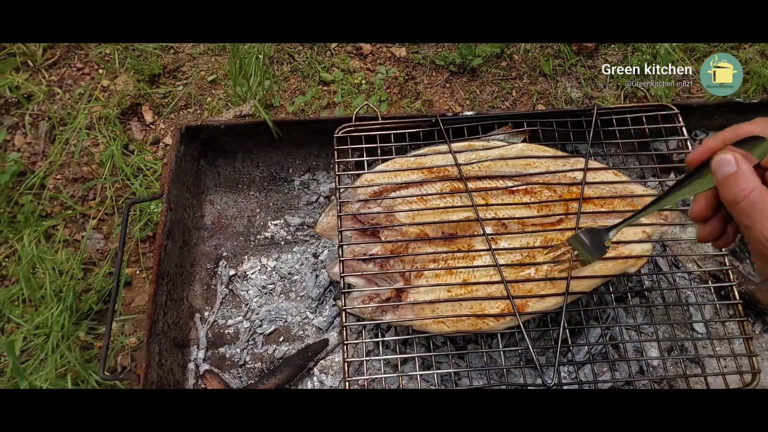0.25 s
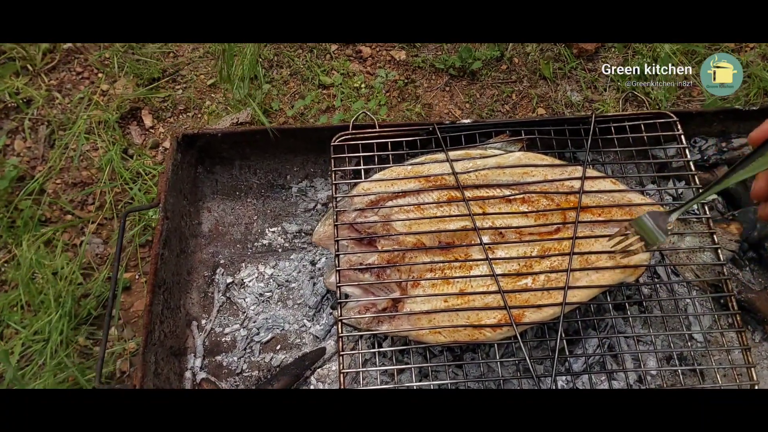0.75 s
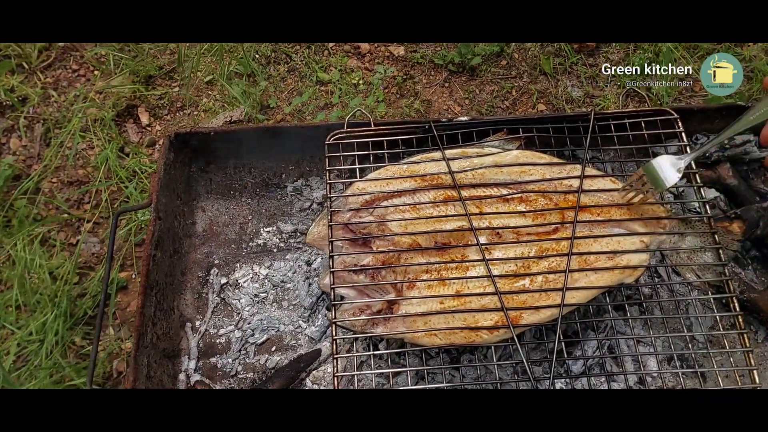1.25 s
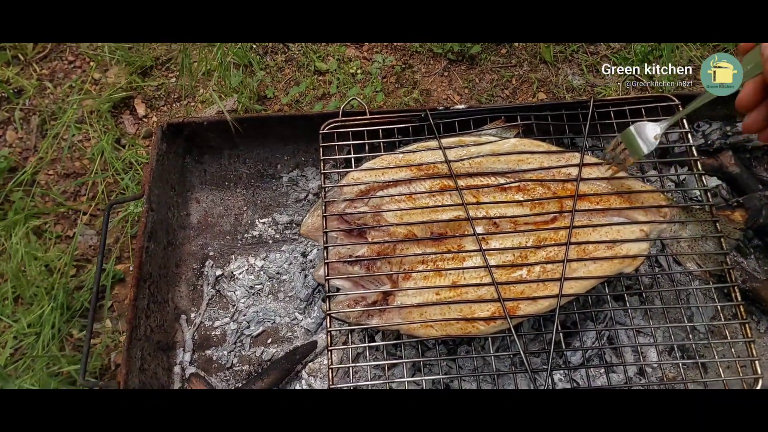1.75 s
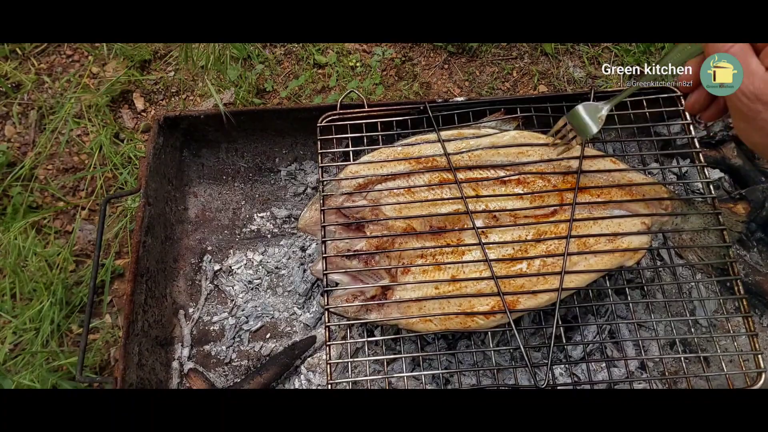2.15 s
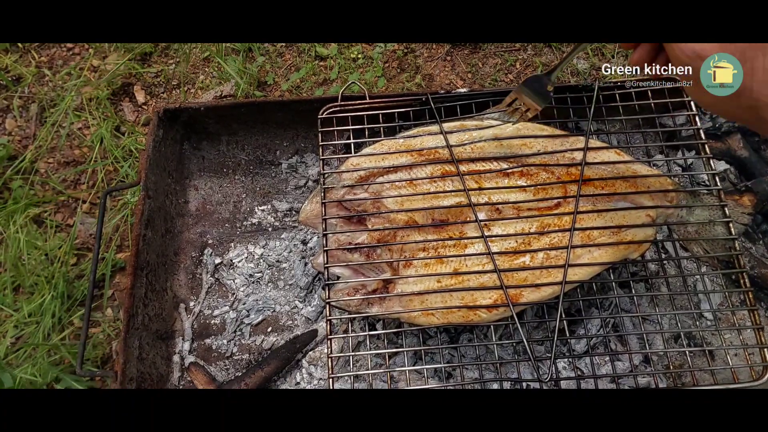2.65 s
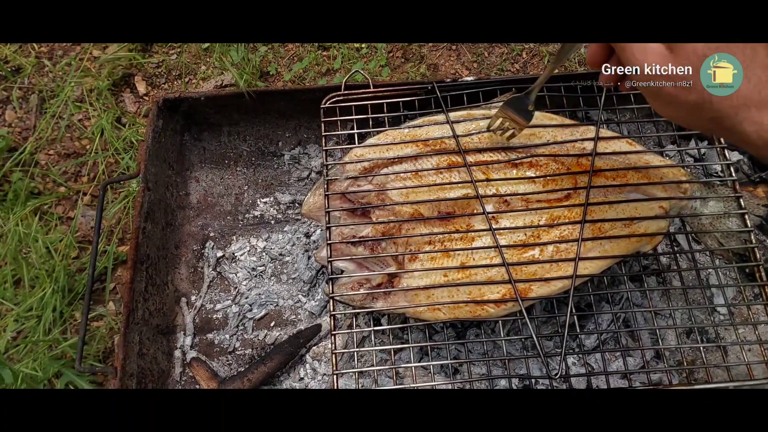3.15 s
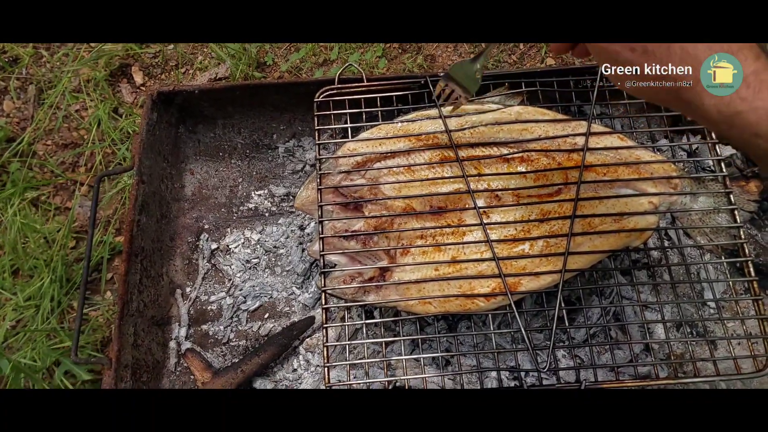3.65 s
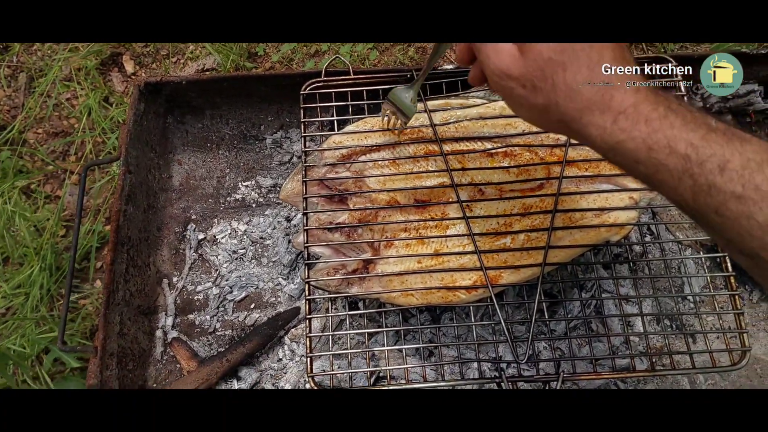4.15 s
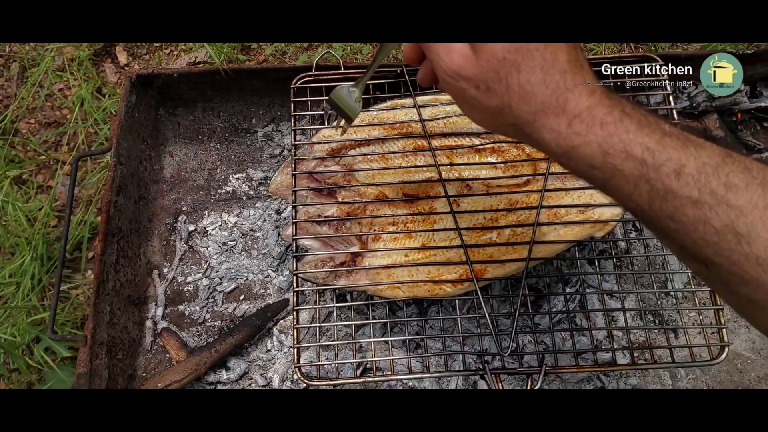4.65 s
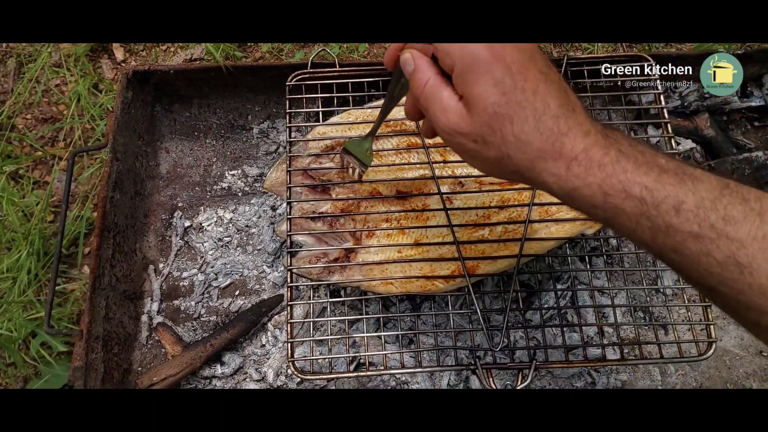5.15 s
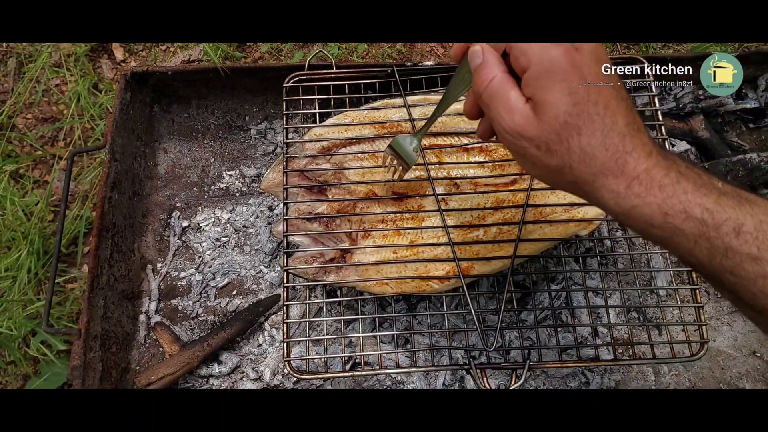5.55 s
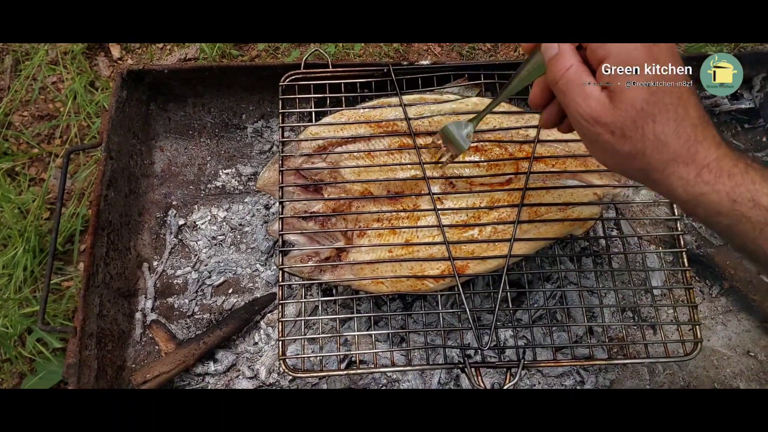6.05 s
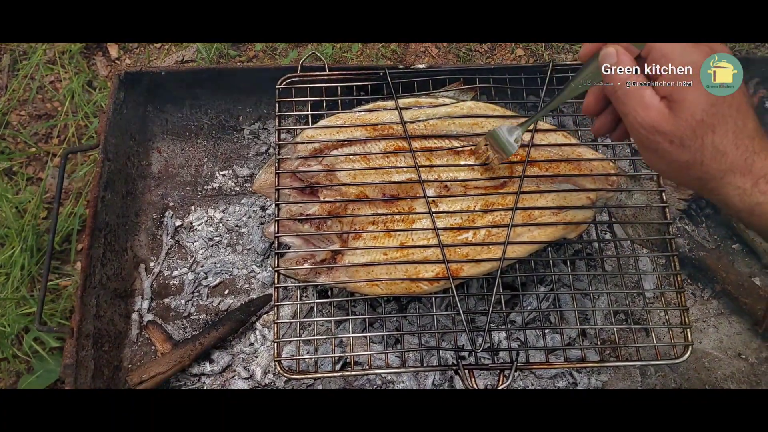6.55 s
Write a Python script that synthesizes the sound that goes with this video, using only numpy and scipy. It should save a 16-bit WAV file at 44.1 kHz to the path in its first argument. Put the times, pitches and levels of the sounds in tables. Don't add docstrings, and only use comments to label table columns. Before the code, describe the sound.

Fish frying over embers in the open air, heard close. Wind rumble swells and drops away early. Crisp, uneven fork jabs follow, strongest around five seconds, with slight metallic tine ring and soft thuds from the wire basket. Beneath lie fine sizzling, popping fat, leaf rustle and faint airy roar; a few dry coal splits stand out, and light metal drags appear near the end.

```python
import sys
import numpy as np
from scipy import signal
from scipy.fft import rfft, irfft
from scipy.io import wavfile
from scipy.ndimage import uniform_filter1d

SR = 44100
rng = np.random.default_rng(int(sys.argv[2]) if len(sys.argv) > 2 else 0)


def int16_out(signal):
    q = np.round(np.clip(np.atleast_2d(signal).T, -1, 1) * 32767)
    wavfile.write(sys.argv[1], SR, q.astype(np.int16))


def amplitude_ratio(level_db):
    exponent = np.asarray(level_db, float) / 20
    return 10 ** exponent


N = 299880

# (pitch [Hz], level [dB], t60 [s])
TINE_MODES = [(2560, -7, .014), (4850, -1, .009), (5900, 0, .009), (7400, -1, .01), (9250, -3, .012),
              (10500, 1, .012), (13500, 3, .012), (14900, 2, .01)]
# (time [s], lag [samples])
FORK_LAG_CURVE = [(0, 4), (1.6, 6), (2.3, 1), (5.0, -3), (6.8, -1)]


def rms_one(x):
    return x / np.sqrt(np.mean(x ** 2) + 1e-20)


def in_time(rows):
    s, *columns = np.transpose(rows)
    return [np.interp(np.arange(N) / SR, s, column) for column in columns]


def at_hz(points, hz):
    table_hz, values = np.transpose(points)
    return np.interp(np.log(hz), np.log(table_hz), values)


def fork_lag(s):
    return np.interp(s, *np.transpose(FORK_LAG_CURVE))


def band(x, low_hz, high_hz):
    sos = signal.butter(2, [low_hz, high_hz], "band", fs=SR, output="sos")
    return signal.sosfilt(sos, x + 1e-18)


def third_octaves(low_hz, count):
    edges_hz = low_hz * 2 ** (np.arange(count + 1) / 3)
    return list(zip(edges_hz, edges_hz[1:]))


def drift(rate_hz):
    r = np.exp(-2 * np.pi * rate_hz * 40 / SR)
    slow = signal.lfilter([1], [1, -2 * r, r * r], rng.standard_normal(N // 40 + 2002))[2000:]
    return np.interp(np.arange(N) / 40, np.arange(len(slow)), rms_one(slow))


def dying(t60_s, size):
    return amplitude_ratio(-60 * np.arange(size) / SR / t60_s)


def ring(force, modes):
    out = 0
    for k, (hz, level_db, t60_s) in enumerate(modes):
        r = amplitude_ratio(-60 / (t60_s * SR))
        w = 2 * np.pi * hz / SR
        mode = signal.lfilter([0, amplitude_ratio(level_db) * np.sin(w)], [1, -2 * r * np.cos(w), r * r], force + 1e-18)
        out = out + (-1) ** k * mode
    return out


def varied(modes, detune, spread_db):
    chance = rng.standard_normal((len(modes), 2))
    return [(hz * (1 + detune * a), level_db + spread_db * b, t60_s)
            for (hz, level_db, t60_s), (a, b) in zip(modes, chance)]


def add(out, sound, s, pan_db, lag):
    for port, (late, gain_db) in enumerate([(lag, pan_db / 2), (0, -pan_db / 2)]):
        at = max(round(s * SR + late), 0)
        out[port, at:at + len(sound)] += amplitude_ratio(gain_db) * sound[:N - at]


def pricks():
    # (time [s], crunch [dB], thud [dB], boom [dB], crunch t60 [s])
    prick_rows = [(0.0126, -28, -28.5, -37, 0.21), (1.2222, -13.5, -33.5, -45, 0.14),
                  (1.592, -17, -31, -39, 0.14), (1.9734, -15.5, -28.5, -47.5, 0.1),
                  (2.3291, -26, -33, -38, 0.2), (2.7208, -21, -51, -52.5, 0.16),
                  (3.0689, -18, -35.5, -40.5, 0.093), (3.4161, -36, -47, -46, 0.56),
                  (3.7877, -27, -33.5, -40, 0.11), (4.0826, -7.5, -33, -37, 0.072),
                  (4.4139, -40, -45, -54.5, 0.17), (4.7348, -23, -39.5, -39, 0.11),
                  (5.046, 1.5, -29, -33.5, 0.08), (5.3461, -8, -38.5, -38.5, 0.12),
                  (5.677, -36, -69, -49, 0.09), (6.7719, -35.5, -39, -54, 0.56)]
    # (low sway [dB], upper wires [dB], push [s])
    load_rows = [(6, 0, 0.0081), (-3, 0.5, 0.015), (7, 10.5, 0.009), (0.5, 4.5, 0.02), (1.5, 3.5, 0.011),
                 (-2, 2, 0.022), (8, 2.5, 0.0093), (-0.5, -6, 0.013), (5, 0, 0.0087), (-11, 0.5, 0.0076),
                 (5, -1, 0.016), (0, -2, .012), (-9, -3, 0.014), (0.5, 0, 0.014), (1, -6, 0.0185),
                 (3, 8, 0.0096)]
    # (pitch [Hz], level [dB], t60 [s])
    basket_modes = [(188, 0.5, 0.037), (229, -10, 0.17), (322, 0, 0.13), (348.9, -16.5, 0.56),
                    (370.7, -4.5, 0.15), (556, -6, 0.053), (675, -4.5, 0.029), (880, -17, 0.036),
                    (1350, -13, 0.061)]
    dull_crunch_db = -15
    size = 9000
    out = np.zeros((2, N))
    t = np.arange(size) / SR
    for (s, bright_db, thud_db, boom_db, t60_s), (low_db, upper_db, push_s) in zip(prick_rows, load_rows):
        dull_db = (bright_db + thud_db) / 2 + dull_crunch_db
        lag = fork_lag(s)
        uneven_db = 3 * np.repeat(rng.standard_normal(size // 40), 40)
        shards = rng.standard_normal(size) * amplitude_ratio(uneven_db)
        bright = band(band(shards * dying(.65 * t60_s, size), 10200, 16500), 9000, 17000)
        dull = band(shards * dying(t60_s, size) * (1 - np.exp(-t / .002)), 2000, 7200)
        tines = amplitude_ratio(-30) * ring(shards * dying(.03, size), varied(TINE_MODES, .02, 5))
        add(out, amplitude_ratio(bright_db - 19.5) * bright, s, -7.0, lag)
        add(out, amplitude_ratio(dull_db + 7.5) * (dull + tines), s, 3.0, lag)

        thud = band(rng.standard_normal(size) * t / 0.02 * np.exp(1 - t / 0.011), 257, 1075)
        loaded = [(hz, level_db + low_db * (hz < 260) + upper_db * (hz > 500), ring_s)
                  for hz, level_db, ring_s in basket_modes]
        push = rng.standard_normal(size) * t / push_s * np.exp(1 - t / push_s)
        boom = ring(push, varied(loaded, 0.0266, 2.5))
        boom = boom / abs(boom).max()
        add(out, amplitude_ratio(thud_db + 8.5) * thud + amplitude_ratio(boom_db + 10.0) * boom, s, .3, lag)
    return out


def snap_rows():
    # (time [s], level [dB], brightness [dB], left lag [samples])
    skin_rows = [(0.0144, -36.5, 5.5, 8.5), (1.2228, -36.5, 9, 8.5), (1.5937, -31, 10, 11),
                 (1.9762, -33.5, 10, 6.5), (1.9931, -36, -26, 10), (2.33, -34, 6, 11),
                 (2.341, -33.5, 7, -7), (2.7111, -39.5, 5, -0.5), (2.7214, -32.5, 9, 5.5),
                 (2.7349, -37, -5, 6), (3.0706, -37.5, 11.5, 1), (3.4176, -35, 6.5, 7),
                 (3.7805, -34.5, 5, 5.5), (3.7899, -30.5, 4.5, -1), (4.0845, -39.5, 13, -3.5),
                 (4.4135, -46.5, 6, 2), (4.4232, -50, 9, 11), (4.7367, -36, 13.5, -6.5),
                 (5.0475, -29.5, 5, -11.5), (5.0517, -30.5, 15, -5), (5.0923, -36.5, 3, 6),
                 (5.1054, -43, 1.1, 6), (5.11, -46, 8, -8), (5.117, -39, 3, -3.5),
                 (5.1276, -46.5, 12, -0.5), (5.3465, -35.5, 9.5, 8.5), (5.3556, -37, 7, 7),
                 (5.6665, -46.5, 8, -1), (6.772, -43, -4, 3), (6.7764, -51.5, 16, 5.5),
                 (1.571, -42.5, 0, 7.5), (2.7045, -64, 3, 2), (3.2605, -47, -1, 1), (6.601, -53.5, -4, 1.5)]
    # (time [s], dull [dB], bright [dB])
    ember_rows = [(0.324, -34.5, -50), (0.5941, -34.5, -39), (0.651, -34.5, -39), (1.1209, -42, -51),
                  (1.3178, -31.5, -41), (2.1476, -42, -70), (2.2638, -40, -51), (2.4316, -25, -34),
                  (2.6558, -33, -39), (2.671, -41, -46), (3.031, -36.5, -40), (3.1654, -32, -47),
                  (3.222, -19, -30), (3.4614, -16, -20), (4.0186, -38.5, -51), (4.116, -36, -43),
                  (4.183, -39, -44), (4.22, -35, -41), (4.6345, -37, -39), (5.3078, -34, -37),
                  (5.7159, -46, -53), (5.739, -41, -54), (5.792, -35, -41), (5.9217, -42, -37),
                  (6.103, -35.5, -47), (6.115, -39, -44), (6.254, -29, -46), (6.35, -33, -47),
                  (6.5064, -34.5, -52)]
    # (time [s], dull [dB], bright [dB])
    drop_rows = [(0.204, -40, -45), (0.4869, -39, -42.5), (0.5725, -28, -32), (0.6135, -48, -43),
                 (0.795, -36, -35.5), (1.134, -46, -45), (1.1615, -40, -42), (1.3316, -36, -42),
                 (1.6746, -39, -43), (1.6846, -34.5, -39), (2.1003, -39.5, -48), (2.2024, -60, -50),
                 (3.8387, -36, -39), (4.167, -42, -45), (4.293, -35, -44), (4.3146, -46, -44),
                 (4.3856, -42, -42), (4.5598, -42, -47), (4.8143, -36.5, -46), (5.1424, -42, -46),
                 (5.1539, -40, -42), (5.2042, -42, -45), (5.2215, -39, -43), (5.5054, -54, -47),
                 (5.5933, -48, -47), (5.7868, -42, -41), (5.886, -46, -50), (5.896, -47, -48),
                 (5.9291, -39, -42), (6.004, -38.5, -49), (6.0312, -41, -47), (6.054, -38.5, -44),
                 (6.1712, -44, -44), (6.2244, -43, -45), (6.432, -50, -52)]
    dull_trim_db, bright_trim_db, lag_spread_samples = -12.5, 14.5, 4.9
    stray_count, stray_db, stray_spread_db, stray_bright_db = 16, -59, 2.5, 5

    loose = [(s, dull_db + dull_trim_db, bright_db - dull_db + bright_trim_db)
             for s, dull_db, bright_db in list(ember_rows) + list(drop_rows)]
    for a, b in rng.random((stray_count, 2)) * .99:
        loose.append((a * N / SR, stray_db + stray_spread_db * (2 * b - 1), stray_bright_db))
    offsets = lag_spread_samples * rng.standard_normal(len(loose))
    return list(skin_rows) + [(s, level_db, bright_db, fork_lag(s) + offset)
                              for (s, level_db, bright_db), offset in zip(loose, offsets)]


def snaps():
    dull, bright = np.zeros((2, 2, N))
    size = 700
    for s, dull_db, bright_db, lag in snap_rows():
        noise = rng.standard_normal((3, size))
        step = noise[0] * dying(.003, size)
        step[0] = 8 * np.sign(step[0])
        step = step / np.sqrt(np.sum(step ** 2))
        scatter = amplitude_ratio(-22.0) * noise[1:] * dying(0.022, size)
        at = round(s * SR)
        for out, level_db, pan_db in [(dull, dull_db + 23.5, 2.2), (bright, dull_db + bright_db + 20.0, -7.0)]:
            add(out, amplitude_ratio(level_db) * step, s, pan_db, lag)
            out[:, at:at + size] += amplitude_ratio(level_db) * scatter
    return band(dull, 1100, 8200) + band(band(bright, 10500, 16500), 9600, 17000)


def ticks():
    # (time [s], level [dB], pitch [Hz])
    tick_rows = [(.6705, -35.5, 2320), (1.597, -35, 1350), (1.612, -32, 1350), (1.996, -35, 1350),
                 (4.738, -18, 8600), (2.4313, -44, 3080), (.9455, -36, 5600), (2.6235, -46, 4800),
                 (2.6555, -32.5, 5620), (3.0295, -37, 4500), (3.2214, -32.5, 3330), (3.4612, -22.5, 4360),
                 (4.6268, -23, 5930), (5.8868, -34, 4600), (6.2538, -39, 3540)]
    fall_cycles = 18
    out = np.zeros((2, N))
    click = np.pad([1.], (0, 600))
    for s, level_db, hz in tick_rows:
        tone = ring(click, [(hz, level_db, fall_cycles / hz)])
        add(out, band(tone, 0.7 * hz, 1.25 * hz), s, 1.5, fork_lag(s))
    return out


def drags():
    # (start [s], length [s], level [dB])
    drag_rows = [
        (0.793, 0.0072, -46),
        (5.539, 0.041, -56.5),
        (5.77, 0.016, -58),
        (5.926, 0.011, -50),
        (5.948, 0.013, -59),
        (6.096, 0.0075, -55),
        (6.113, 0.037, -54.5),
        (6.17, 0.012, -54),
        (6.37, 0.031, -57),
        (6.43, 0.011, -57),
    ]
    out = np.zeros((2, N))
    for s, length_s, level_db in drag_rows:
        size = round(length_s * SR)
        uneven_db = 4 * np.repeat(rng.standard_normal(size // 60 + 1), 60)[:size]
        rough = rng.standard_normal(size) * amplitude_ratio(uneven_db)
        force = np.pad(amplitude_ratio(level_db) * rough * np.hanning(size) ** 0.049, (0, 1000))
        tines = amplitude_ratio(-21) * ring(force, varied(TINE_MODES, .03, 3))
        add(out, tines + amplitude_ratio(-4) * band(force, 4000, 16000), s, -2, -2)
    return out


def crack():
    # (time [s], level [dB], upper modes [dB], left lag [samples])
    crack_rows = [
        (2.3291, -15.5, -28, -4),
        (2.4307, -33, -6, -6),
        (3.0712, -23.5, -13, 11),
        (3.2207, -41, -14, 6),
        (3.4609, -11, -2.5, 7.5),
        (6.253, -59, -4, 9),
    ]
    # (pitch [Hz], level [dB], t60 [s])
    coal_modes = [(293, 0, 0.0072), (760, 4, 0.0088), (1320, -3, 0.029), (1762, 3.5, 0.041),
                  (2380, -86, 0.013)]
    out = np.zeros((2, N))
    for s, level_db, upper_db, lag in crack_rows:
        click = np.pad(amplitude_ratio(level_db) * np.hanning(6) / 6.6, (0, 2000))
        upper = ring(click, coal_modes[2:]) + amplitude_ratio(21) * band(click, 4000, 8100)
        add(out, ring(click, coal_modes[:2]) + amplitude_ratio(upper_db) * upper, s, 1.5, lag)
    return out


def spit(sizzle_db, per_s):
    # (frequency [Hz], density [dB per Hz])
    burst_spectrum = [(2000, -31), (5000, 2), (8500, -4), (13000, -0.5), (16000, -28)]
    born = rng.random(N) < per_s * amplitude_ratio(5.0 * drift(6)) / SR
    sizes_db = 4 * np.minimum(rng.exponential(1, N), 3)
    bursts = born * amplitude_ratio(sizes_db) * rng.choice([-1, 1], N)
    near = rng.random(N) < .5
    ports = np.array([np.roll(bursts * near, 5) + np.roll(bursts * ~near, -4), bursts])
    out = 0
    for k, (low_hz, high_hz) in enumerate(third_octaves(1840, count=9)):
        level_db = at_hz(burst_spectrum, np.sqrt(low_hz * high_hz))
        out = out + (-1) ** k * amplitude_ratio(level_db) * band(ports, low_hz, high_hz)
    return amplitude_ratio(sizzle_db - 6.5) * rms_one(out)


def pit(x):
    out = x.copy()
    echoes = [[(.0005, -9.5), (.0017, -8.5)], [(.0009, -10.5), (.0023, -5.5)]]
    for port, taps in enumerate(echoes):
        for late_s, level_db in taps:
            lag = round(late_s * SR)
            out[port, lag:] -= amplitude_ratio(level_db) * x[port, :-lag]
    return out


def bed_noise(spectrum, low_hz, count, patchy_db, lag):
    # (frequency [Hz], shared power [0..1])
    likeness = [(100, 1), (300, 0.67), (800, 0.84), (2000, 0.23), (15000, 0.27)]
    out = []
    together = drift(3)
    white = rng.standard_normal((2, 3, N))
    for k, (low, high) in enumerate(third_octaves(low_hz, count)):
        shared, left, right = band(white[k % 2], low, high)
        alike = at_hz(likeness, low)
        common = np.array([np.roll(shared, lag), shared])
        pair = np.sqrt(alike) * common + np.sqrt(1 - alike) * np.array([left, right])
        flicker_db = patchy_db * (.5 * together + drift(14))
        out.append(amplitude_ratio(at_hz(spectrum, np.sqrt(low * high)) + flicker_db) * pair)
    return out


def bed(roar_db, rustle_db, hiss_db, sizzle_db):
    # (frequency [Hz], density [dB per Hz])
    roar_spectrum = [(53, -31), (90, -3), (185, 0.5), (316, -0.5), (376, -2), (626, -1), (960, -5.5),
                     (1820, -13.5), (2200, -19), (2860, -49), (4840, -120)]
    # (frequency [Hz], density [dB per Hz])
    sizzle_spectrum = [(710, -72), (1200, -12.5), (1830, -8), (2760, -12.5), (5840, -5.5), (8600, -9),
                       (11500, -15), (15000, -5.5), (16000, -6)]
    roar = rms_one(sum(bed_noise(roar_spectrum, 88.3, count=12, patchy_db=1.0, lag=-19)))
    bands = bed_noise(sizzle_spectrum, 1265, count=11, patchy_db=1.2, lag=2)
    layers = [(rustle_db, bands[:4]),
              (0.64 * rustle_db + .35 * hiss_db - 2.0, bands[4:6]),
              (hiss_db + 0.085, bands[6:9]),
              (sizzle_db + 0.054, bands[9:])]
    out = amplitude_ratio(roar_db + 5.5) * roar
    for level_db, part in layers:
        out = out + amplitude_ratio(level_db) * rms_one(sum(part))
    return out


def air():
    # (time [s], rumble [dB], left-right [dB])
    gust_curve = [
        (0.0, -36.5, -18),
        (0.15, -49, 20.5),
        (0.328, -33.5, 3),
        (0.378, -29.5, -15.5),
        (0.44, -22, 1),
        (.55, -26, -1.5),
        (.64, -33, 7.5),
        (0.934, -50.5, -26),
        (1.0, -88, 20),
    ]
    # (time [s], peak [dB], left-right [dB], half length [s])
    puff_rows = [(1.278, -56.5, -10, 0.09), (1.502, -54, -17, 0.022), (1.656, -38.5, -7, 0.033),
                 (2.063, -48.5, -11, 0.11), (2.328, -38, 5, 0.11), (2.588, -53.5, -24, 0.032),
                 (2.71, -48, -7, 0.044), (2.982, -50, 13, 0.058), (3.61, -52, -6, .06),
                 (4.8, -50, 0, 0.046), (5.13, -54, 3, 0.057), (5.47, -53.5, -5, 0.077),
                 (6.448, -50, -15.5, 0.076), (6.633, -46.5, 0, 0.032)]
    puff_fall_db = 11.5
    calm_db, calm_sag_db_per_s, calm_pan_db = -58.5, 0.84, -3
    t = np.arange(N) / SR
    side = np.array([[.5], [-.5]])
    level_db, pan_db = in_time(gust_curve)
    gust = amplitude_ratio(2 * (level_db + side * pan_db)) * (t < gust_curve[-1][0])
    power = gust + amplitude_ratio(2 * (calm_db - calm_sag_db_per_s * t + side * calm_pan_db))
    for s, peak_db, pan_db, half_s in puff_rows:
        near = slice(round((s - 3 * half_s) * SR), round((s + 3 * half_s) * SR))
        fall_db = puff_fall_db * abs(t[near] - s) / half_s
        power[:, near] += amplitude_ratio(2 * (peak_db + side * pan_db - fall_db))
    return 10 * np.log10(power)


def wind():
    # (time [s], peak [dB], pitch [Hz], port [0 left, 1 right])
    slap_rows = [(0.199, -25, 124, 0), (0.266, -20.5, 89.5, 0), (0.309, -19.5, 98, 0), (0.344, -38, 110, 1),
                 (0.385, -12.5, 122, 1), (.415, 0, 141, 1), (0.421, -13, 110, 0), (0.431, -11, 139, 0),
                 (0.441, -6.5, 139, 0), (0.445, -9, 62.4, 0), (0.513, -20, 120, 0), (0.615, -17, 126, 1),
                 (0.628, -17, 91.5, 1), (.54, -19, 92, 1), (0.68, -26, 90.5, 1), (.389, -16.5, 200, 1),
                 (0.447, -14, 58, 1), (0.482, -16, 54.6, 0), (0.576, -22, 58, 0), (.625, -17, 55, 0),
                 (.135, -30, 65, 1), (.83, -34, 95, 0)]
    level_db = air()
    lumps = amplitude_ratio(1.6 * np.array([drift(12), drift(13)]))
    white = rng.standard_normal((2, N))
    deep = rms_one(band(band(white, 35, 76), 29, 95))
    flutter = rms_one(band(white, 46.0, 163)) * amplitude_ratio(-8.0 + 0.064 * (level_db + 12))
    out = lumps * (deep + flutter) * amplitude_ratio(np.minimum(level_db + 2.0, -20))
    for s, peak_db, hz, port in slap_rows:
        cycles = np.arange(1800) / SR * hz
        swing = np.sin(2 * np.pi * cycles) * cycles * np.exp(-2.6 * cycles)
        at = round(s * SR)
        out[int(port), at:at + 1800] += amplitude_ratio(peak_db) * swing / abs(swing).max()
    return band(out, 29, 750)


def scene():
    # (time [s], level [dB])
    leaves_curve = [(0, -61), (.3, -65), (.72, -59), (.97, -64), (1.52, -66), (2.95, -67), (3.11, -61.5),
                    (3.35, -57), (3.7, -60), (4.01, -65), (4.26, -63.5), (4.7, -68), (5.53, -64),
                    (6.12, -66), (6.63, -70), (6.8, -77)]
    # (time [s], level [dB])
    frying_curve = [(0, -58.5), (.3, -53.5), (.72, -52.5), (.97, -56), (1.52, -56), (2.74, -58.5),
                    (3.05, -55), (3.24, -57), (3.6, -58), (3.84, -59), (4.2, -55.5), (4.58, -59),
                    (5.11, -60), (5.53, -57), (6.12, -57), (6.3, -59.5), (6.65, -58.5), (6.8, -64)]
    (leaves_db,), (fat_db,) = in_time(leaves_curve), in_time(frying_curve)
    gusty_db = leaves_db - leaves_db.mean()
    lively_db = fat_db - fat_db.mean()
    roar_db = -59 + 0.17 * gusty_db
    hiss_db = -63 + lively_db + 0.077 * gusty_db
    near = pricks() + drags() + ticks() + crack() + spit(fat_db, per_s=250)
    return pit(near) + snaps() + bed(roar_db, leaves_db, hiss_db, fat_db) + wind()


def roll_off(x):
    return signal.sosfilt(signal.butter(12, 16970, fs=SR, output="sos"), x)


def record(dry):
    cutoff_hz, skirt_hz = 15800, 300
    dry = dry - 0.22 * band(dry, 7360, 9330)
    above = np.clip((np.fft.rfftfreq(N, 1 / SR) - cutoff_hz) / skirt_hz + .5, 0, 1)
    top = irfft(rfft(dry) * above, N)
    sharp = uniform_filter1d(top ** 2, 200) > 80 * np.median(top ** 2)
    kept = dry - top * (1 - .25 * uniform_filter1d(1. * sharp, 120))
    return roll_off(np.clip(kept, -.99, .99))


dry = scene()
out = record(dry)
int16_out(out)
```